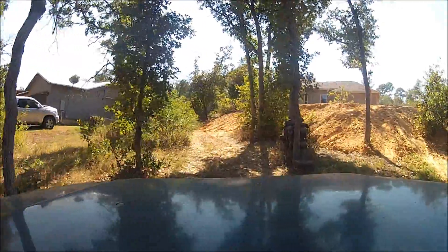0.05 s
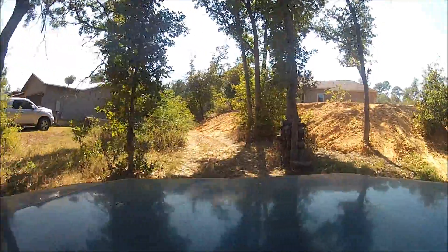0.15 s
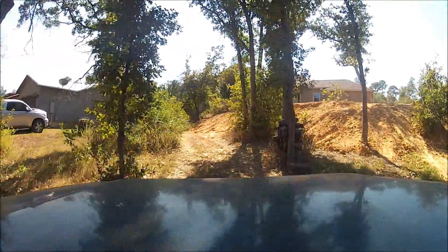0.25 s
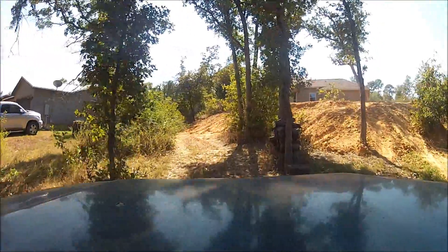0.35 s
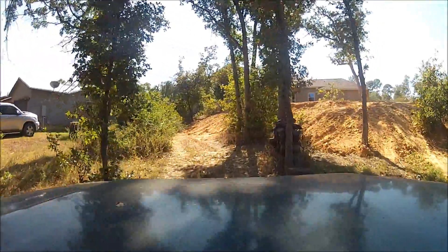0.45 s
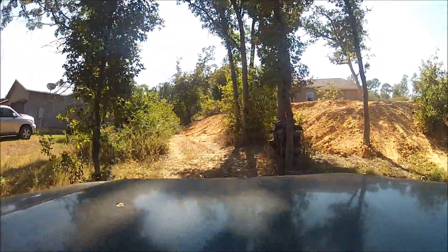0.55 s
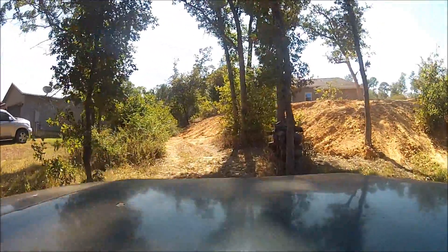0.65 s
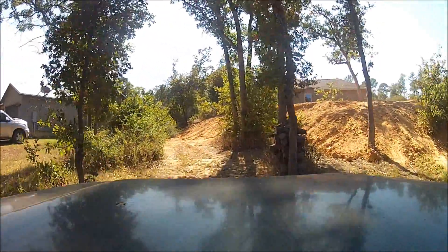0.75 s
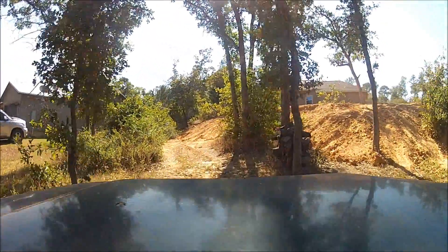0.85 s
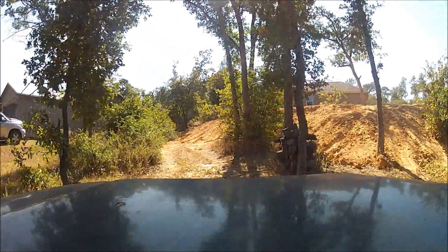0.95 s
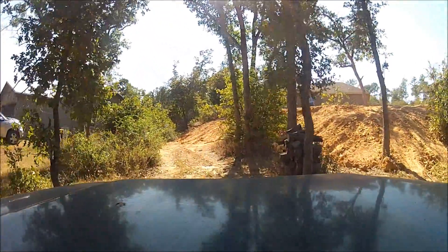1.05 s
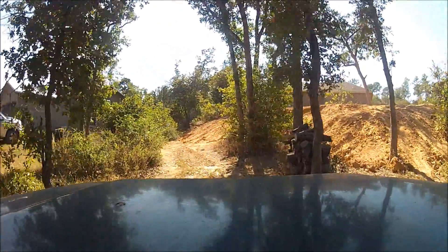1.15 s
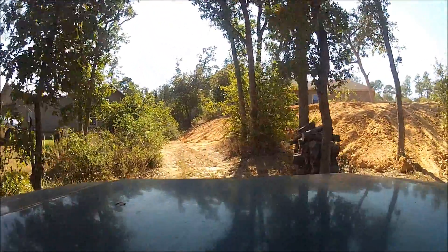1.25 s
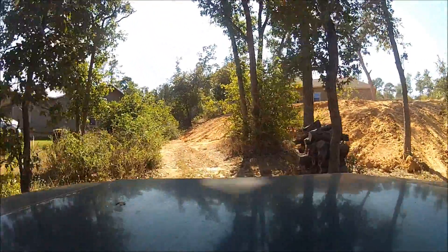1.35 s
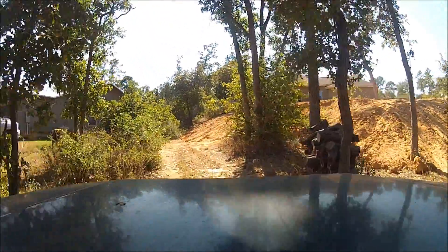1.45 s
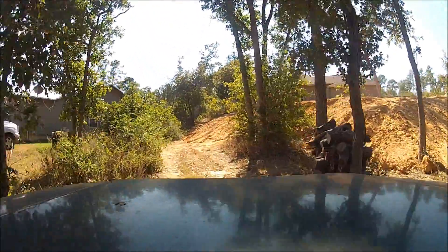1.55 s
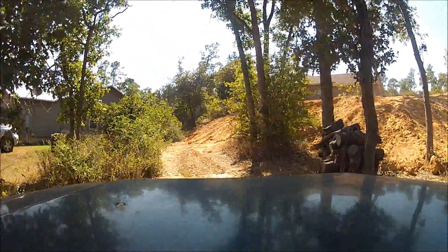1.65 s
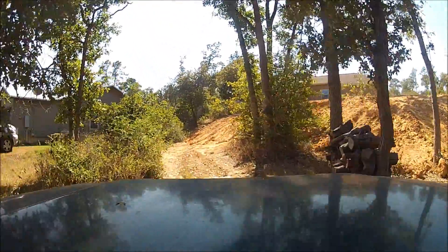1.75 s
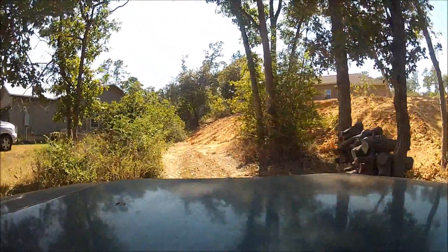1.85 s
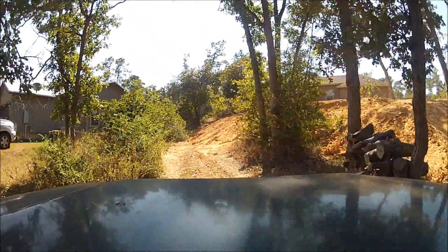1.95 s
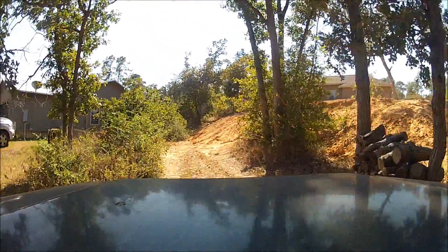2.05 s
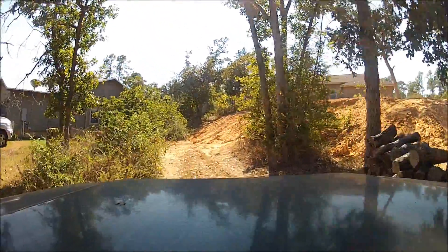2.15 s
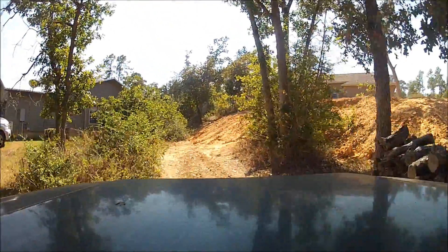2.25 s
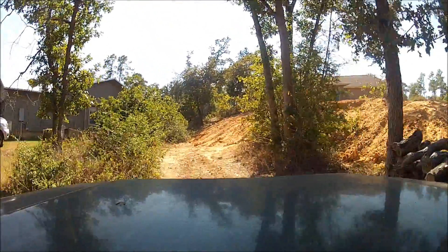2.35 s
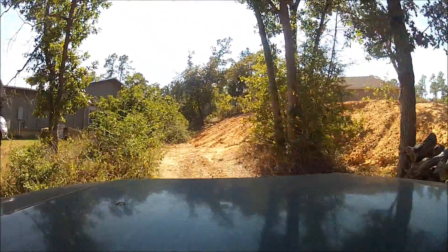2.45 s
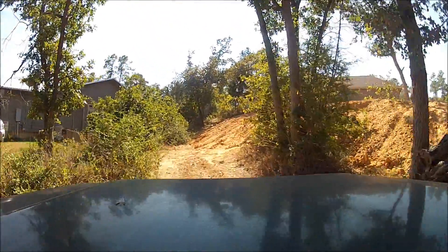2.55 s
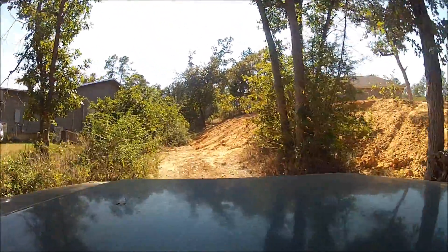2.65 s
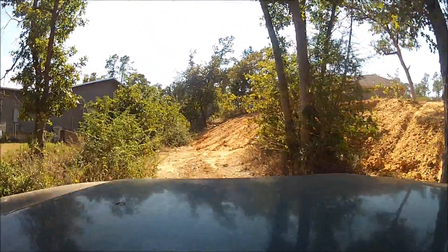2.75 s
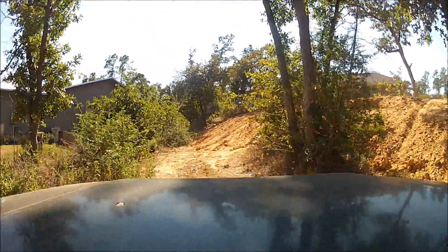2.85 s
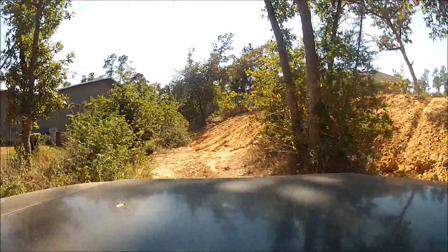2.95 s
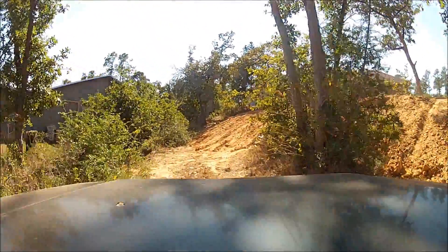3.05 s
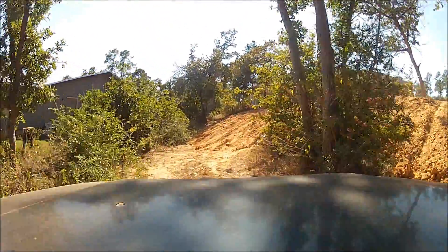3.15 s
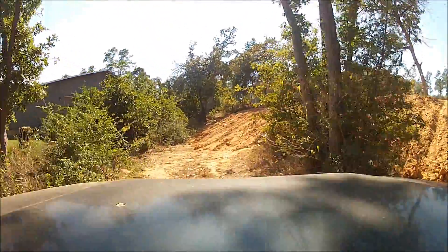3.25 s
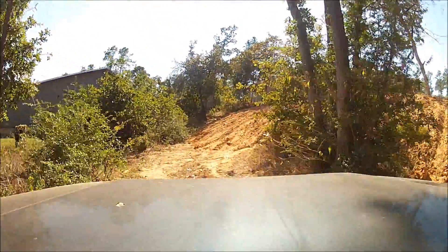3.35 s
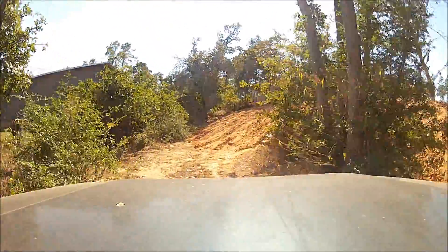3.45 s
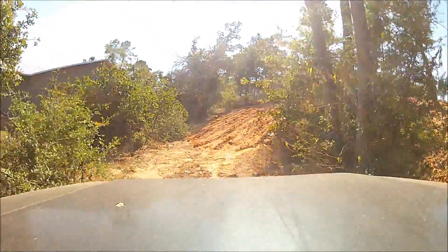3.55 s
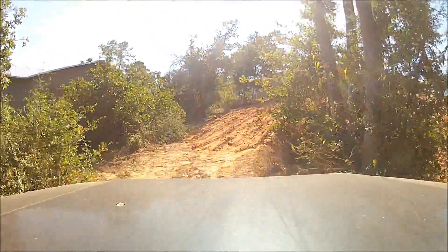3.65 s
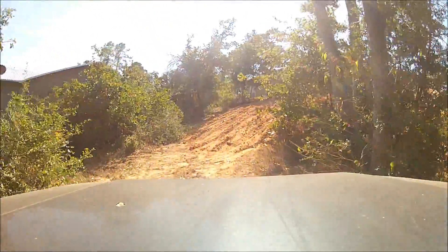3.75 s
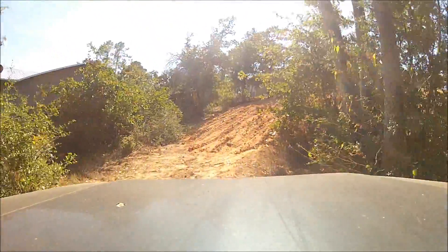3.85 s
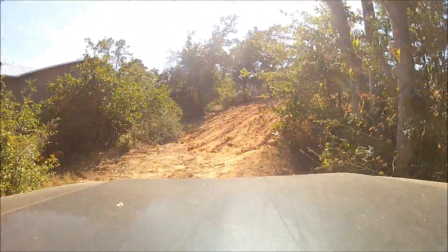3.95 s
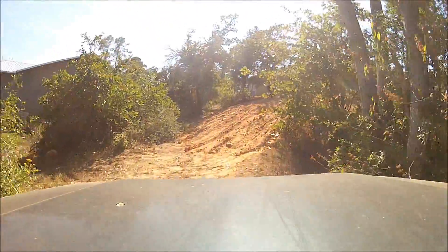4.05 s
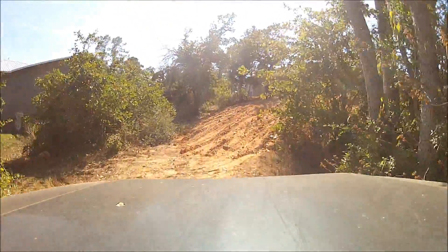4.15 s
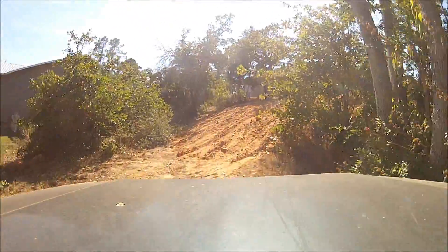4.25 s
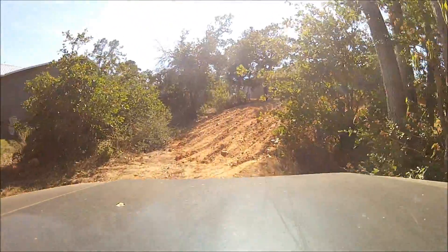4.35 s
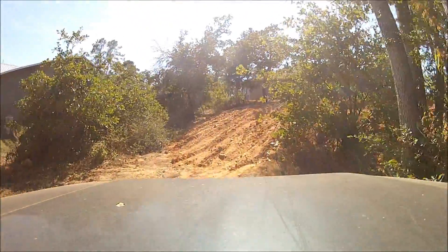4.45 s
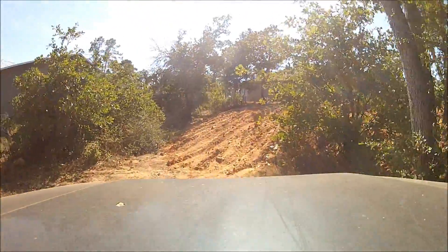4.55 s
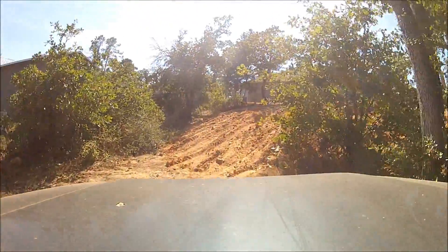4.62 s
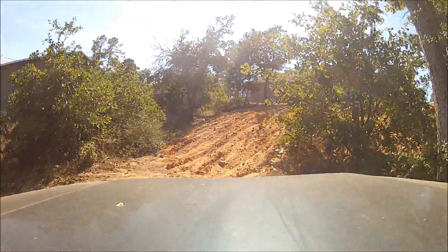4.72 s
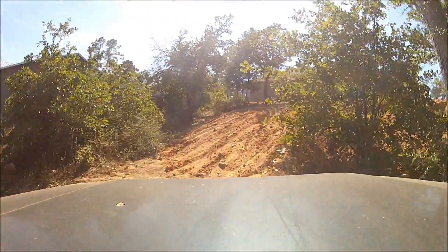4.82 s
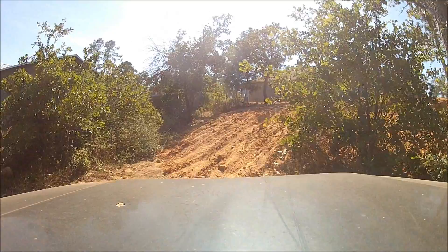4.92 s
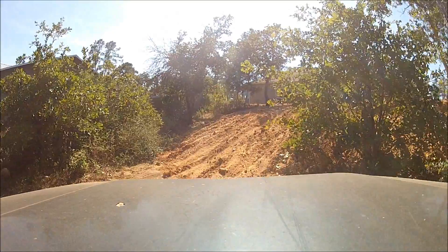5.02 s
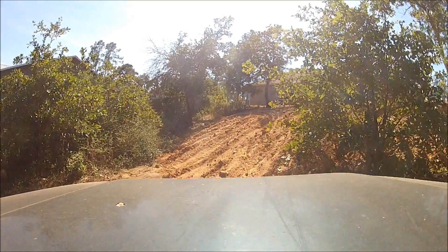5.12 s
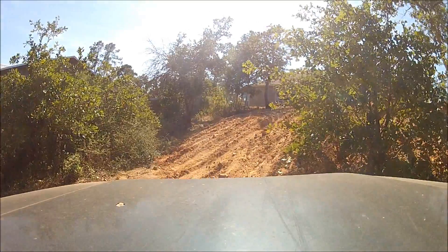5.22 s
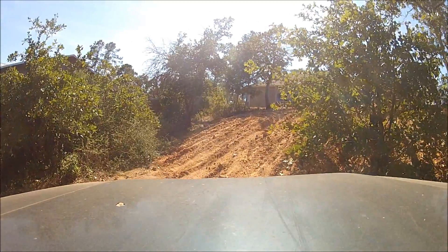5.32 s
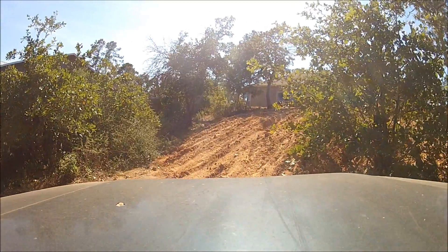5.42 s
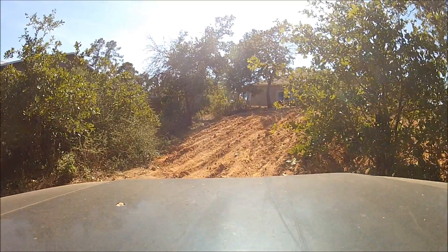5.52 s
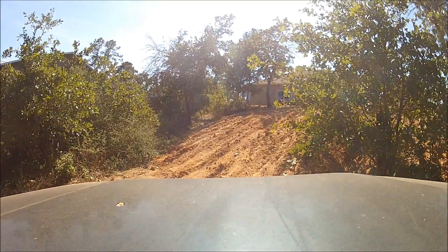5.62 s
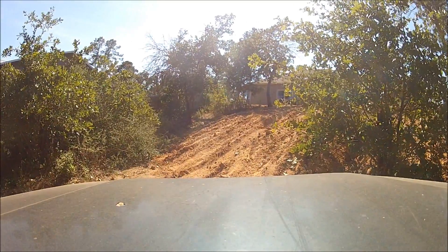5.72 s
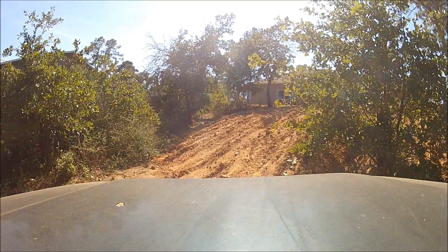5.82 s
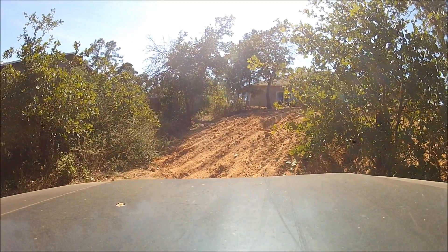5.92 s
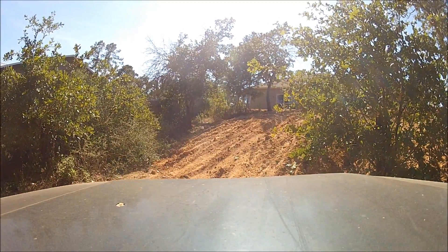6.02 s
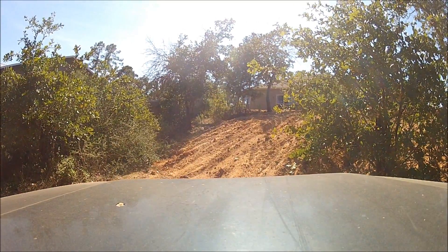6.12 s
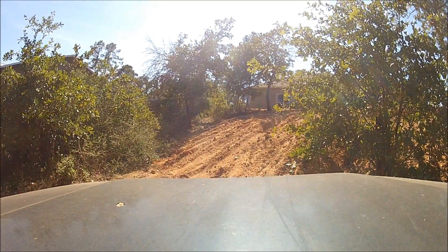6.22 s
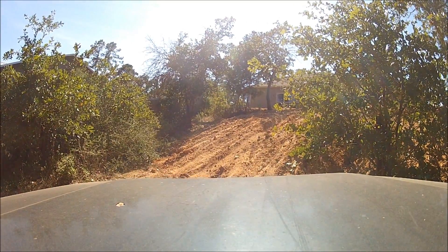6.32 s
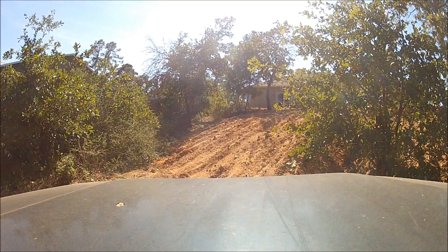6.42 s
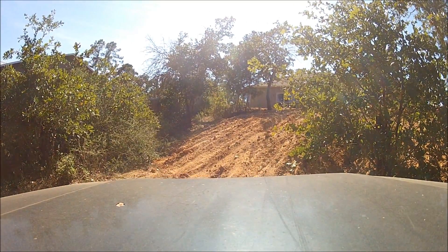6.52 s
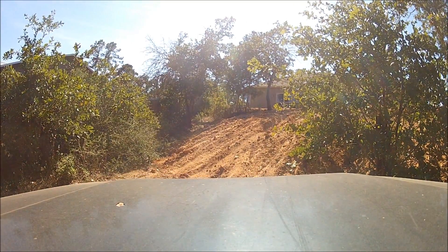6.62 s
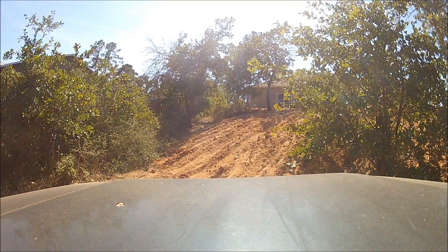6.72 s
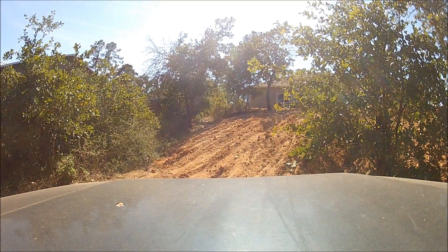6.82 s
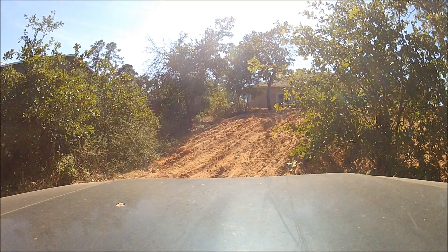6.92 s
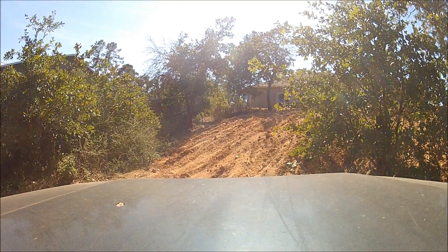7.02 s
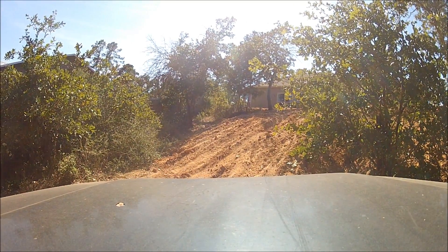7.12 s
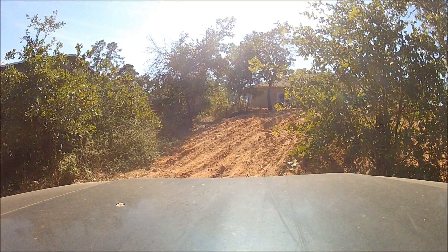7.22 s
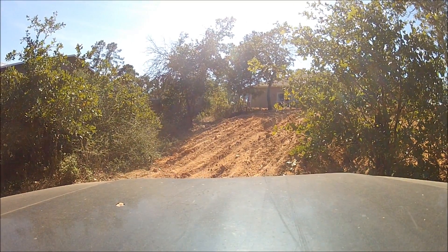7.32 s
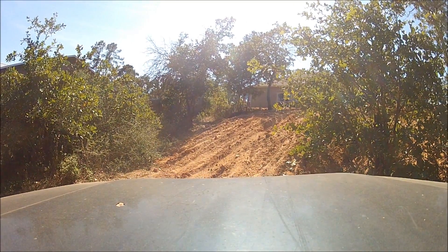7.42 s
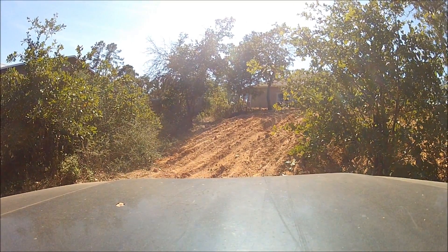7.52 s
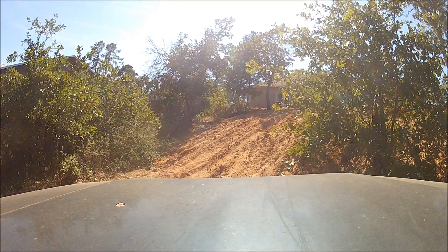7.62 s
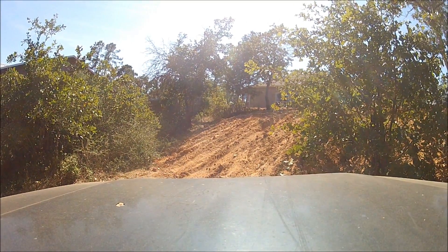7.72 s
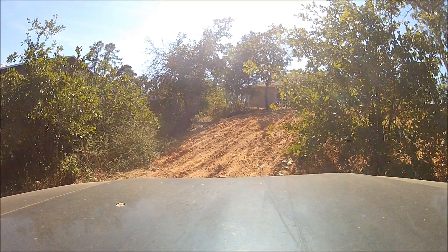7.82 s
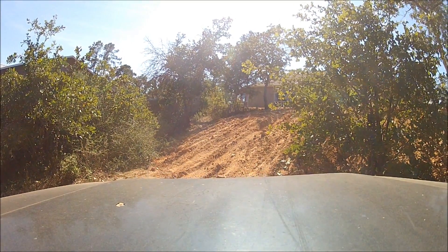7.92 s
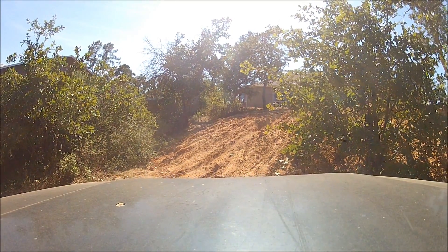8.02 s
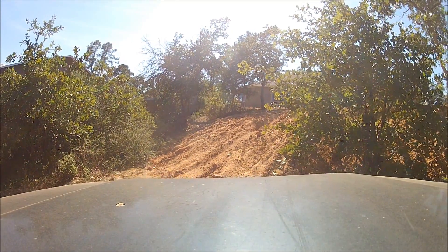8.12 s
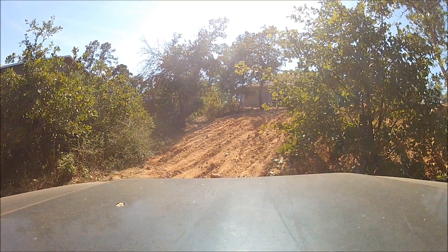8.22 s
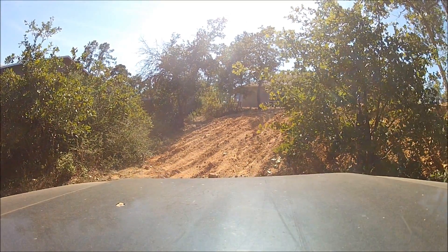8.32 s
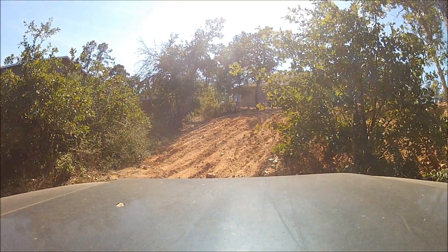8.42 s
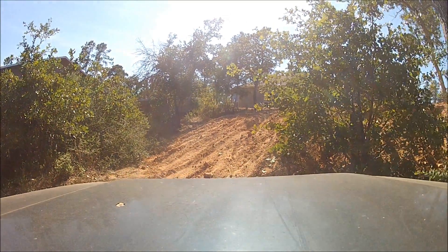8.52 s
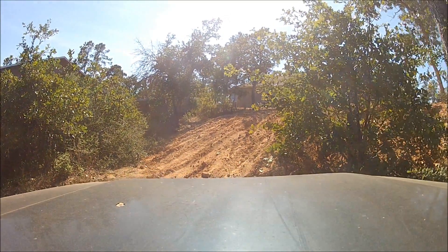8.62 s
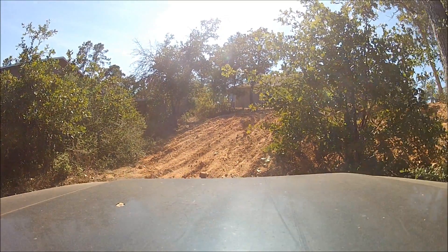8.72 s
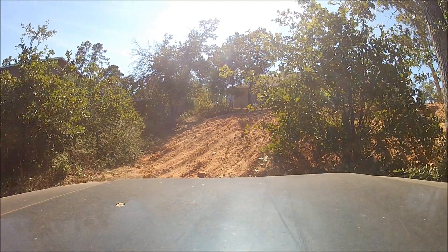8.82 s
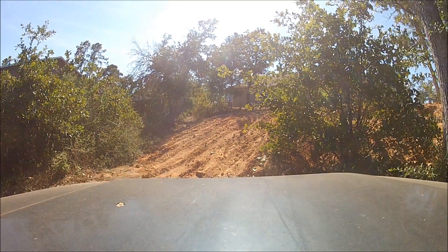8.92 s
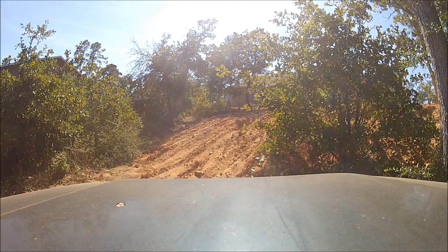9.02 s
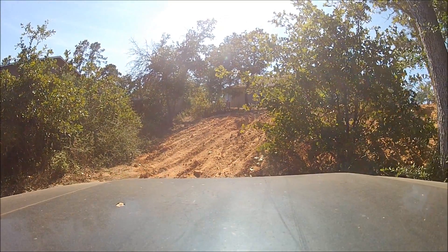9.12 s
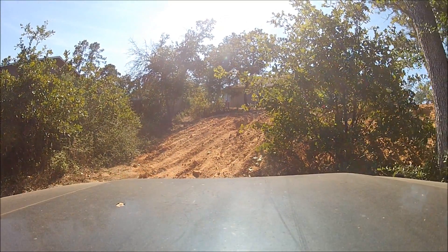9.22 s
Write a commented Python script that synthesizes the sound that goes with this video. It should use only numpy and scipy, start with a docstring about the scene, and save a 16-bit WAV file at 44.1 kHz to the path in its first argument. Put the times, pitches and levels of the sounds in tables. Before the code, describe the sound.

Low throbbing truck exhaust and fan roar ease down to idle, loose metal clatters over a bump, then steering pump hiss and faint belt squeals.

```python
"""The exhaust of an eight-cylinder truck drones through its body as it crawls over dirt and eases up to a bank.
Heard from just behind the bonnet: sines at crankshaft orders over firing-gated rumble, coloured by the body.
Shaped noise makes the fan and tyre roar, the hiss under the bonnet and the intake hiss, all following engine speed.
Decaying impact trains and sines make clanks, clunks and thumps as a rut jolts the truck; the bonnet buzzes on.
Near the end the steering pump hisses, whines and rings the bonnet, its belt squeals, its load drags the idle down."""
import sys
import numpy as np
from scipy import signal
from scipy.fft import rfft, irfft
from scipy.io import wavfile
from scipy.ndimage import uniform_filter1d

SR = 44100
rng = np.random.default_rng(int(sys.argv[2]) if len(sys.argv) > 2 else 0)


def master(y):
    """Save y as 16-bit WAV."""
    cut = np.clip(np.atleast_2d(y).T, -1, 1)
    pcm = np.round(cut * 32767)  # scale
    wavfile.write(sys.argv[1], SR, pcm.astype(np.int16))


N = 408807
TIME = np.arange(N) / SR
FREQ = np.maximum(np.arange(N // 2 + 1) * SR / N, 1e-3)

# Engine speed. Each row: time in seconds, crankshaft rate in turns per second.
CRANK_SPEED = [(0,34.3),(.4,34.4),(.85,30.3),(1.15,28),(1.5,25.1),(1.75,25.6),(2.05,28.3),(2.35,28.8),(2.8,32.7),(3.1,31.3),(3.35,25.5),(3.65,20.3),(4,19.6),(4.7,20.4),(5.25,18.6),(5.7,20.1),(6.05,20.6),(6.65,19.2),(7.07,22.3),(7.5,18.3),(8.15,19.2),(8.55,15.4),(8.85,15.3),(9.05,18.5),(9.27,19.6)]
# Slow rise and fall of roar, air and intake. Each row: time in seconds, gain in dB.
WASH_GAIN = [(0,0),(0.7,1),(1.3,0),(2.3,-0.9),(2.9,-0.5),(3.4,1.2),(4,0.5),(6.7,-0.25),(7.05,0.9),(7.5,0.14),(9.27,-0.3)]

# Hiss under the bonnet. Each row: frequency in Hz, relative density in dB.
AIR_COLOUR = [(700,5),(2000,4.5),(3000,3.5),(3500,4.5),(4500,6),(5400,-0.5),(7400,1),(10100,-8.5),(12500,-8),(13900,-30),(14700,-2),(15100,-29)]
# Intake hiss. Each row: frequency in Hz, relative density in dB.
INTAKE_COLOUR = [(8000,-55),(10200,-16),(11200,-6),(12100,4),(13000,-17),(14000,-37)]
# Fan and tyre roar. Each row: frequency in Hz, relative density in dB.
ROAR_COLOUR = [(120,-15.5),(215,0.5),(275,0),(315,-4),(370,-3.5),(470,-8),(580,-9),(700,-12.5),(860,-13.5),(1080,-20),(1450,-24.5),(2300,-36.5),(5000,-45),(15000,-86)]
# Bonnet resonances. Each row: frequency in Hz, width in Hz, gain in dB.
BONNET_MODES = [(2600,50,10),(2683,34,7),(3800,24,-22),(4730,37,-28),(9380,56,10.5),(14500,200,-6)]

# Belt slips. Each row: start in seconds, length in seconds, starting pitch in Hz, level in dB.
BELT_SLIPS = [(6.947,0.17,1498,-50.5),(7.041,.035,1875,-55),(7.107,0.017,1860,-55),(7.168,.018,1845,-53),(7.214,.1,1480,-56),(7.262,0.028,1910,-51),(7.336,0.018,1845,-49),(8.087,0.1,1480,-53)]
# Turns of the steering wheel. Each row: start in seconds, length in seconds, hiss level in dB.
STEERING_TURNS = [(6.85,0.41,-49.5),(7.45,0.77,-59),(8.17,0.58,-41),(9.006,0.31,-44)]
# Steering valve hiss. Each row: frequency in Hz, relative density in dB.
VALVE_COLOUR = [(500,2.5),(850,-1),(1300,-9.5),(1900,-8.5),(3000,-15),(4900,-6),(5900,-13.5),(7000,-9.5),(9500,-19),(12000,-20),(14800,-18)]
# Steering line resonances. Each row: frequency in Hz, width in Hz, gain in dB.
LINE_MODES = [(1480,62,6.5),(1615,47,10.4),(1700,36,3.5),(1825,64,9.3),(1980,55,9.5),(2260,45,4),(2450,37,4.5)]
# Pump whine under pressure. Each row: pitch in Hz, level in dB relative to the hiss.
PUMP_WHINE = [(1630,-13.5),(1810,-15),(1970,-22)]

# Suspension bumps. Each row: start in seconds, thump level in dB, pitch in Hz, panel judder level in dB.
SUSPENSION_BUMPS = [(2.986,-6,114,-43),(4.475,-19,214,-42.5),(4.5,-23,257,-49),(4.521,-17.5,197,-52),(4.663,-21.5,298,-39),(4.69,-26,325,-51),(4.76,-31,325,-42),(4.851,-16,150,-42),(4.89,-19,304,-56),(4.965,-25,200,-53),(5.041,-19,244,-41.5),(5.269,-41,244,-39.5),(8.018,-33,422,-44),(8.027,-25,161,-53),(8.564,-24.5,240,-43),(8.626,-39,276,-49)]
# Panel judder. Each row: frequency in Hz, relative density in dB.
PANEL_COLOUR = [(150,4),(215,10),(305,4.5),(420,0),(600,-3.5),(850,-2.5),(1100,-8),(1450,-10),(2200,-19),(5000,-17.5),(12000,-25.5)]
# Heavy parts knocking. Each row: start in seconds, level in dB, ring time (60 dB fall) in seconds.
MOUNT_CLUNKS = [(2.865,-24,0.054),(4.465,-39,0.099),(4.518,-32,0.1),(4.652,-32,0.14),(4.755,-28,0.15),(4.891,-24.5,0.095),(4.932,-34,0.088),(4.97,-30,0.13),(5.03,-48,0.081)]
# Chassis resonances. Each row: frequency in Hz, width in Hz, relative gain in dB.
CHASSIS_MODES = [(240,32,2),(300,35,5),(387,45,-1),(660,50,10),(770,63,-15),(1130,64,-11),(1480,50,-17)]
# Loose metal clanks, and late short bonnet rings as the steering hiss surges.
# Each row: start in seconds, relative level in dB, decay (60 dB fall) in seconds, part pitch in Hz.
METAL_RINGS = [(4.364,-40.5,0.23,2330),(4.52,-58,.15,4300),(4.611,-44,0.071,4330),(4.628,-37,0.11,4350),(4.642,-23.5,0.055,4100),(4.65,-30,0.055,2550),(4.68,-41.5,0.43,3640),(4.738,-34,0.055,3400),(4.7465,-23,0.038,4400),(4.752,-24,0.036,3340),(4.878,-34,0.15,3200),(4.901,-30,0.11,3700),(4.95,-40.5,0.24,2620),(5.242,-42,0.14,4260),(5.262,-36,0.061,2630),(5.27,-30,0.088,3990),(5.297,-42.5,.14,2610),(5.34,-49,0.16,4370),(5.432,-47,0.086,4320),(5.467,-45,0.18,4170),(5.531,-46.5,0.14,4270),(5.92,-55,0.5,2600),(8.016,-42,0.056,2580),(8.285,-43,0.15,2620),(8.632,-40.5,0.14,2650),(8.815,-47,0.13,2620),(9.21,-42,0.23,2590)]
# Chatter of clanks and rings. Each row: frequency in Hz, gain in dB.
METAL_COLOUR = [(200,11),(750,-3),(1900,-1.5),(2700,0.5),(4200,-0.5),(5200,-3.5),(6300,-6.5),(7900,-2),(9400,-11),(10800,-19),(13500,-22),(14800,-15)]
# Resonances of clanks and rings. Each row: frequency in Hz, width in Hz, gain in dB.
METAL_RESONANCES = [(1270,71,6),(1580,84,-16),(2580,62,9.5),(2660,63,10),(3300,44,9),(3940,39,7),(4290,52,10),(4820,83,3),(7470,110,5),(8300,53,8),(8730,58,6),(9420,100,16),(14600,180,15)]
# Hardest metal contacts. Each row: start in seconds, level in dB, pitch in Hz.
HARD_STRIKES = [(4.6418,-10.5,4080),(4.6468,-20,3320),(4.7478,-21,4430),(4.7582,-24,3800),(4.9105,-29,3820),(5.2738,-27,3200),(8.0175,-36,2570)]

# Exhaust tones. Each row: multiple of the crankshaft rate, then relative level in dB at idle,
# in dB while pulling, in dB under the drag of the steering pump.
EXHAUST_ORDERS = [(1.5,-22,-12,-24),(2,-2.5,-12,5),(3,-13,1,-12),(3.5,-16,-11,-15),(4,1.5,-3.5,-0.5),(4.5,-20,-7.5,-12),(5,-2,-6,2),(6,-1,0,-0.5),(8,-5,-2,-28),(10,-12,-8.5,0.5)]
# Passage of the exhaust tones through the body. Each row: frequency in Hz, gain in dB.
BODY_COLOUR = [(30,-0.5),(39,-5.5),(48,-0.5),(60,2),(80,-3.5),(100,-0.5),(122,2),(160,-1),(182,-13),(215,-7.5),(300,-7)]
# Body boom. Each row: frequency in Hz, width in Hz, gain in dB.
BOOM_MODES = [(31,5,-8),(153,7,2)]
# Exhaust rumble. Each row: frequency in Hz, relative density in dB.
RUMBLE_COLOUR = [(18,-26),(33,-17),(45,2.5),(56,-1.5),(72,-4.5),(100,-1),(135,3.5),(162,0.5),(181,-6),(205,-2.5),(300,-22.5),(600,-49)]

IDLE_HZ, FIRINGS_PER_TURN = 20, 4
# The engine pulls, then the driver eases off before the bank.
EASE_OFF_S, EASE_TIME_S = 3.65, 0.26
# The steering pump loads the engine, which labours before its speed sags.
LOAD_S, LOAD_TIME_S = 8.2, 0.21
LABOUR_S, LABOUR_LENGTH_S, LABOUR_DB = 7.98, 0.33, 3
STEER_ATTACK_S, STEER_RELEASE_S = 0.14, 0.41
STEER_SURGE_DEPTH, STEER_SURGE_PEAK_S = 0.07, 8.29
SLIP_SAG_HZ_PER_S = 130
JUDDER_RISE_S, JUDDER_T60_S = 0.0067, 1
STRIKE_T60_S, STRIKE_OVERTONE_RATIO, STRIKE_OVERTONE_DB = 0.008, 1.92, -5
BUZZ_S, BUZZ_LENGTH_S, BUZZ_FADE_S, BUZZ_DB = 4.6, 0.45, 1.2, -56
BUZZ_HZ, BUZZ_WIDTH_HZ = 2630, 170
NOTCH_HZ, NOTCH_Q, TOP_HZ = 6030, 7, 15000


def undb(db):
    """Decibels to gain."""
    return 10 ** (np.asarray(db) / 20)


def unit(x):
    """Scale to a standard deviation of 1."""
    return x / np.std(x)


def curve(table):
    """Second column of a table, interpolated at every sample."""
    time_s, value = np.transpose(table)
    return np.interp(TIME, time_s, value)


def shape(x, response):
    """Filter by a frequency response."""
    return irfft(rfft(x) * response, N)


def colour(x, points):
    """Filter by (Hz, dB) points, interpolated over log frequency."""
    hz, db = np.transpose(points)
    return shape(x, undb(np.interp(np.log(FREQ), np.log(hz), db)))


def resonances(modes):
    """Summed response of (Hz, width Hz, dB) resonators."""
    return sum(undb(db) / (1 + 1j * hz / width * (FREQ / hz - hz / FREQ)) for hz, width, db in modes)


def ring(x, modes):
    """The sound plus the resonances it excites."""
    return shape(x, 1 + resonances(modes))


def walk(rate_hz):
    """Random steps smoothed into ramps, spread near 1."""
    k = int(SR / rate_hz)
    steps = np.repeat(rng.standard_normal(N // k + 1), k)
    return 1.052 * uniform_filter1d(steps, k)[:N]


def gated_noise(turns, depth):
    """Noise swelling with each firing."""
    return rng.standard_normal(N) * (1 + depth * np.cos(2 * np.pi * FIRINGS_PER_TURN * turns))


def contacts(rate_hz, spread_db):
    """Dense random impacts of either sign; dB sizes spread exponentially, up to three spreads."""
    hit = rng.random(N) < rate_hz / SR
    size = undb(spread_db * np.minimum(rng.exponential(size=N), 3))
    return unit(hit * size * np.sign(rng.standard_normal(N)))


def decay(start_s, t60_s, rise_s):
    """Quick rise and exponential fall, cut after twice the 60 dB time."""
    out, sounding = np.zeros(N), (TIME > start_s) & (TIME < start_s + 2 * t60_s)
    age = TIME[sounding] - start_s
    out[sounding] = (1 - np.exp(-age / rise_s)) * np.exp(-np.log(1000) * age / t60_s)
    return out


def swell(start_s, length_s, attack_s, release_s):
    """Linear rise, hold to the end of the length, linear fade."""
    rise = np.clip((TIME - start_s) / attack_s, 0, 1)
    return rise * np.clip(1 - (TIME - start_s - length_s) / release_s, 0, 1)


def unsteady_tone(hz, waver):
    """Sine whose pitch trembles by the given share."""
    return np.sin(2 * np.pi * np.cumsum(hz * (1 + waver * walk(150))) / SR)


def pulling():
    """1 while the engine pulls, 0 once the driver has eased off."""
    return np.clip(1 - (TIME - EASE_OFF_S) / EASE_TIME_S, 0, 1)


def loudness(speed_hz, idle_db, doubling_db, pull_db):
    """Level in dB: grows per doubling of engine speed, offset while pulling."""
    return idle_db + doubling_db * np.log2(speed_hz / IDLE_HZ) + pull_db * pulling()


def air(turns, flutter_db, db):
    """Thin hiss from the engine bay, ringing the bonnet."""
    hiss = colour(gated_noise(turns, depth=0.023), AIR_COLOUR)
    return unit(ring(hiss, BONNET_MODES)) * undb(db + flutter_db * walk(30))


def intake(turns, flutter_db, db):
    """Air drawn past the throttle sings in a narrow treble band."""
    return unit(colour(gated_noise(turns, depth=0.03), INTAKE_COLOUR)) * undb(db + flutter_db * walk(30))


def roar(turns, flutter_db, db):
    """Fan wash and tyres on soft dirt, throbbing with the engine."""
    return unit(colour(gated_noise(turns, depth=0.043), ROAR_COLOUR)) * undb(db + flutter_db * walk(25))


def belt(waver):
    """The loaded belt slips with faint unsteady squeals that sag in pitch."""
    out = 0
    for s, length_s, hz, db in BELT_SLIPS:
        squeal = unsteady_tone(hz - SLIP_SAG_HZ_PER_S * (TIME - s), waver)
        out = out + undb(db) * swell(s, length_s, attack_s=0.012, release_s=0.018) * squeal
    return out


def steering(turns, flutter_db, waver, grit):
    """Fluid spits through the valve and rings the lines, surging once per engine cycle; the pump whines."""
    spitting = gated_noise(turns, depth=0.086) + grit * contacts(rate_hz=450, spread_db=2.5)
    flow = ring(colour(spitting, VALVE_COLOUR), LINE_MODES)
    hiss = unit(ring(flow, BONNET_MODES))
    whine = sum(undb(db) * unsteady_tone(hz, waver) for hz, db in PUMP_WHINE)
    pressure = sum(undb(db) * swell(s, length_s, STEER_ATTACK_S, STEER_RELEASE_S)
                   for s, length_s, db in STEERING_TURNS)
    # two crankshaft turns make one engine cycle
    peak_turns = np.interp(STEER_SURGE_PEAK_S, TIME, turns)
    surge = 1 + STEER_SURGE_DEPTH * np.cos(np.pi * (turns - peak_turns))
    return (hiss + whine) * pressure * surge * undb(flutter_db * walk(30))


def buzz(flutter_db):
    """The shaken bonnet chatters on its catch and settles slowly."""
    band = np.exp(-((FREQ - BUZZ_HZ) / BUZZ_WIDTH_HZ) ** 2)
    chatter = unit(shape(contacts(rate_hz=600, spread_db=6.0), band))
    envelope = swell(BUZZ_S, BUZZ_LENGTH_S, attack_s=0.069, release_s=BUZZ_FADE_S)
    return chatter * envelope * undb(BUZZ_DB + flutter_db * walk(17))


def panels(chatter_db):
    """Body panels judder after each bump."""
    shake = sum(undb(db) * decay(s, JUDDER_T60_S, JUDDER_RISE_S) for s, _, _, db in SUSPENSION_BUMPS)
    return shake * unit(colour(contacts(rate_hz=1200, spread_db=chatter_db), PANEL_COLOUR))


def thumps(t60_s):
    """Decaying low sines: dull knocks as the suspension takes a bump."""
    return sum(undb(db) * decay(s, t60_s, rise_s=0.00062) * np.sin(2 * np.pi * hz * (TIME - s))
               for s, db, hz, _ in SUSPENSION_BUMPS)


def clunks(chatter_db):
    """Heavy parts knock in their mounts and ring the chassis with a hollow note."""
    clatter = unit(shape(contacts(rate_hz=1100, spread_db=chatter_db), resonances(CHASSIS_MODES)))
    return clatter * sum(undb(db) * decay(s, t60_s, rise_s=0.0044) for s, db, t60_s in MOUNT_CLUNKS)


def metal_rings(chatter_db, ring_db, part_db, part_width_hz):
    """Loose metal clanks, and late short bonnet rings as the steering hiss surges; each part adds its own ring."""
    chatter, force = contacts(rate_hz=3200, spread_db=chatter_db), 0
    for s, db, t60_s, hz in METAL_RINGS:
        # the tiny offset keeps the resonator clear of denormal numbers
        burst = undb(db) * decay(s, t60_s, rise_s=0.0013) * chatter + 1e-18
        part = signal.lfilter(*signal.iirpeak(hz, hz / part_width_hz, fs=SR), burst)
        force = force + burst + undb(part_db) * part
    return undb(ring_db) * ring(colour(force, METAL_COLOUR), METAL_RESONANCES)


def strikes():
    """The hardest contacts: sharp metallic clicks with one overtone."""
    out = 0
    for s, db, hz in HARD_STRIKES:
        phase = 2 * np.pi * hz * (TIME - s)
        tone = np.sin(phase) + undb(STRIKE_OVERTONE_DB) * np.sin(STRIKE_OVERTONE_RATIO * phase)
        out = out + undb(db) * decay(s, STRIKE_T60_S, rise_s=0.00037) * tone
    return out


def exhaust(turns, waver_db, tone_db, rumble_db, drone_db, rough):
    """Crankshaft orders boom in the body over the rumble of gas puffs; their balance shifts with load."""
    pull, drag, tones = pulling(), np.clip((TIME - LOAD_S) / LOAD_TIME_S, 0, 1), 0
    for order, idle_db, pull_db, drag_db in EXHAUST_ORDERS:
        db = idle_db + pull * (pull_db - idle_db) + drag * (drag_db - idle_db)
        # uneven firing: odd orders (halves rounded to even) lie a quarter cycle off,
        # so the note lopes without throbbing
        cycles = order * turns + np.round(order) % 2 / 4
        tones = tones + undb(db + waver_db * walk(7.1)) * np.sin(2 * np.pi * cycles)
    hum = unit(ring(colour(tones, BODY_COLOUR), BOOM_MODES))
    rumble = unit(colour(gated_noise(turns, depth=0.22), RUMBLE_COLOUR))
    # the harder the engine works, the more turbulence covers the tones
    effort_db = rough * (drone_db - np.mean(drone_db))
    return undb(drone_db) * (undb(tone_db - effort_db) * hum + undb(rumble_db + effort_db) * rumble)


def scene():
    """Sum of all sources; engine, wash and steering follow the crankshaft."""
    speed_hz = curve(CRANK_SPEED)
    turns = np.cumsum(speed_hz) / SR
    air_db = loudness(speed_hz, idle_db=-51.5, doubling_db=11.5, pull_db=-0.7)
    intake_db = loudness(speed_hz, idle_db=-63.0, doubling_db=14, pull_db=1.0)
    roar_db = loudness(speed_hz, idle_db=-38.5, doubling_db=15.5, pull_db=0.16)
    labour_db = LABOUR_DB * swell(LABOUR_S, LABOUR_LENGTH_S, attack_s=0.05, release_s=0.1)
    drone_db = loudness(speed_hz, idle_db=-30.5, doubling_db=11.5, pull_db=0.7) + labour_db

    wash = air(turns, flutter_db=0.62, db=air_db) + intake(turns, flutter_db=1.6, db=intake_db)
    wash = wash + roar(turns, flutter_db=0.96, db=roar_db)
    pump = belt(waver=0.0085) + steering(turns, flutter_db=1.84, waver=0.0152, grit=0.63)
    bumps = buzz(flutter_db=-2) + panels(chatter_db=-1.0) + thumps(t60_s=0.064) + clunks(chatter_db=10)
    metal = metal_rings(chatter_db=-0.2, ring_db=3.0, part_db=5, part_width_hz=58) + strikes()
    engine = exhaust(turns, waver_db=2.0, tone_db=-1.64, rumble_db=-4.0, drone_db=drone_db, rough=0.12)
    return (wash * undb(curve(WASH_GAIN)) + pump + bumps + metal + engine)[None]


def record(dry):
    """The microphone has a narrow dip in the treble; a steep low-pass cuts the top."""
    heard = signal.lfilter(*signal.iirnotch(NOTCH_HZ, NOTCH_Q, fs=SR), dry)
    return signal.sosfilt(signal.ellip(10, .2, 80, TOP_HZ, fs=SR, output="sos"), heard)


dry = scene()
out = record(dry)
master(out)
```